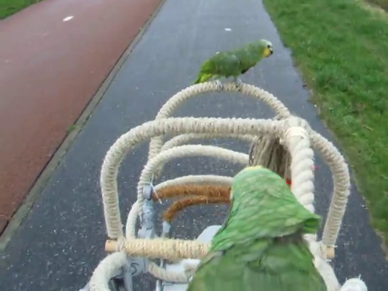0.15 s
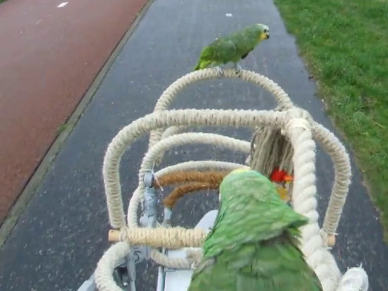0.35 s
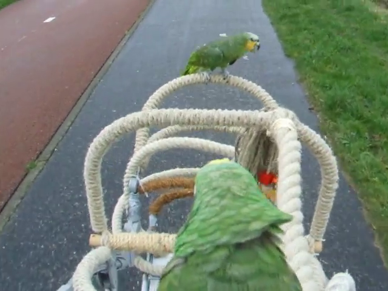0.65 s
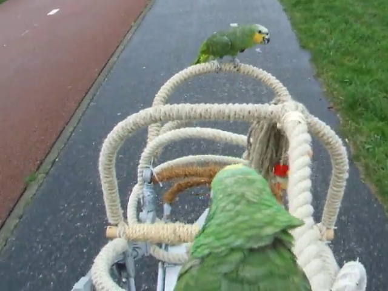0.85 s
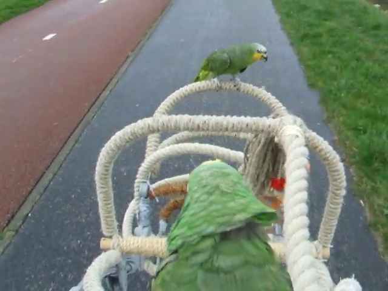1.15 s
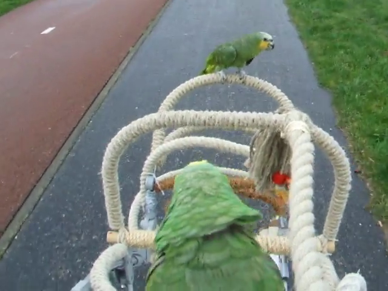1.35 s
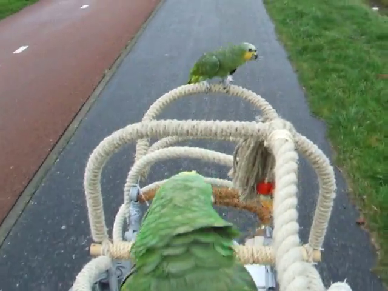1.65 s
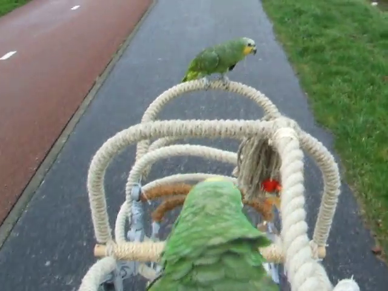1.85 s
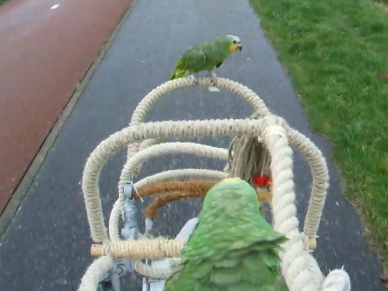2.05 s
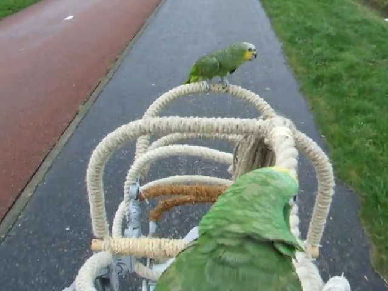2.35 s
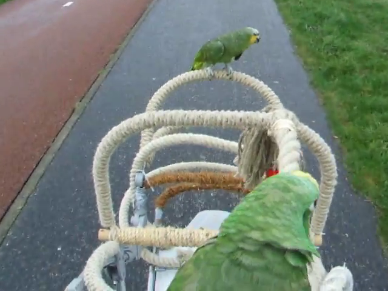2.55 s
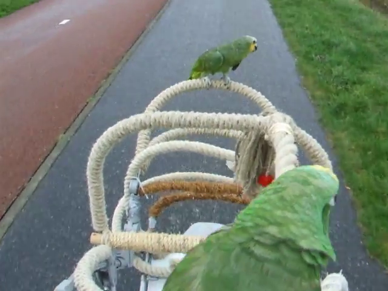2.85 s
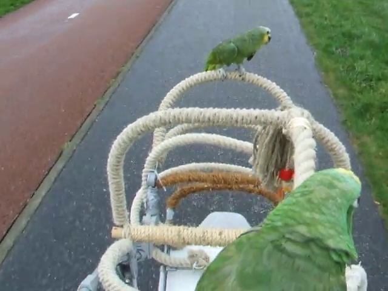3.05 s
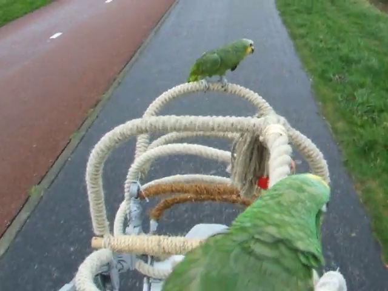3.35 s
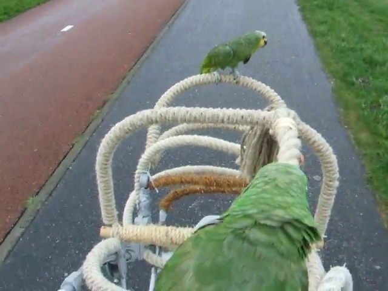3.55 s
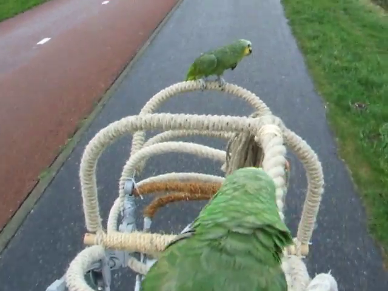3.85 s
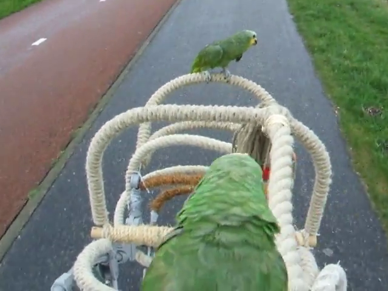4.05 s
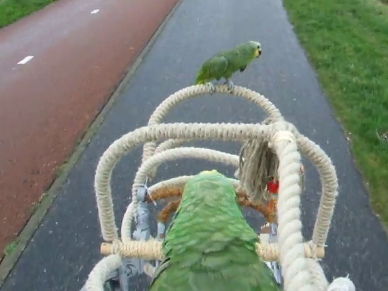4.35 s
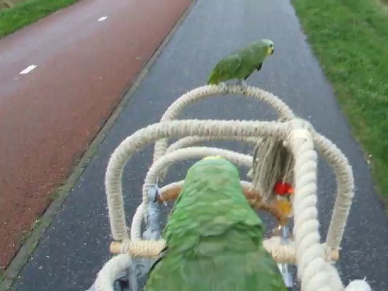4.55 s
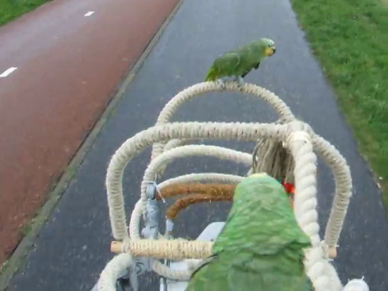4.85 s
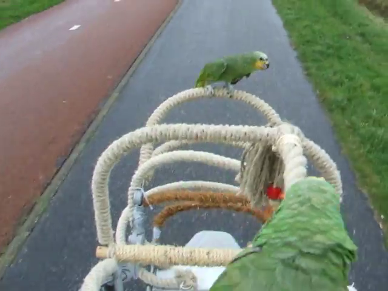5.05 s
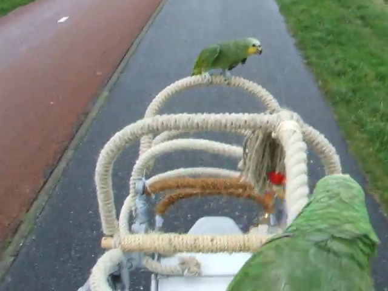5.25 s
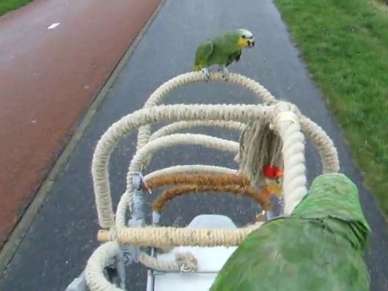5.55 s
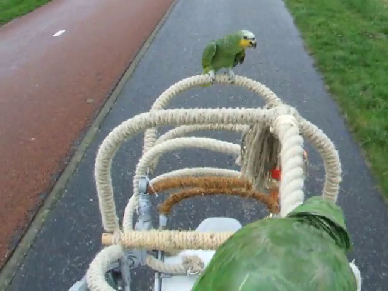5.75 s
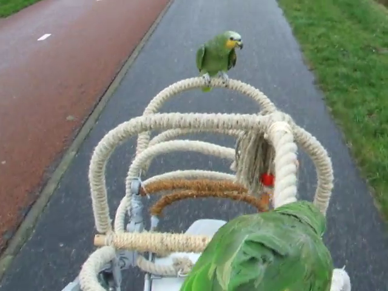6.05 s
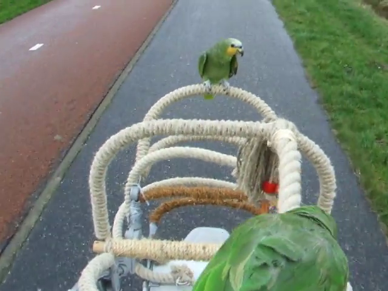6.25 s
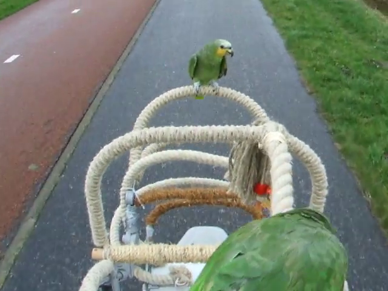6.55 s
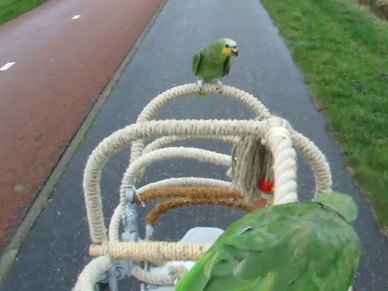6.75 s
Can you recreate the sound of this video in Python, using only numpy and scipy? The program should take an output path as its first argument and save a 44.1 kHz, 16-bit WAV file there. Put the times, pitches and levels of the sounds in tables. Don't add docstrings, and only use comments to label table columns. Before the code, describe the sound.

Riding outdoors on a bicycle, a parrot repeats loud, short, hoarse squawks, the first already under way at the start and the last ending before six seconds. Between them one hears faint smooth road hiss, dipping slightly under each call, a deep unsteady hum and gusts bumping the microphone. After the last squawk only hiss, hum and wind remain. The sound is mono, close and dry, with a dull top.

```python
import sys
import numpy as np
from scipy import signal
from scipy.io import wavfile
from scipy.ndimage import uniform_filter1d

SR = 44100
rng = np.random.default_rng(int(sys.argv[2]) if len(sys.argv) > 2 else 0)


def invert_db(level):
    return 10 ** (np.asarray(level, dtype=float) / 20)


def transcribe(signal):
    frames = np.atleast_2d(signal).T
    limited = np.clip(frames, -1, 1)
    pcm = np.round(limited * 32767).astype(np.int16)
    wavfile.write(sys.argv[1], SR, pcm)


N = 303849


def rms_one(x):
    return x / np.sqrt(np.mean(x ** 2) + 1e-20)


def in_time(rows):
    s, *columns = np.transpose(rows)
    return [np.interp(np.arange(N) / SR, s, c) for c in columns]


def drift(rate_hz):
    r = np.exp(-16 * np.pi * rate_hz / SR)
    white = rng.standard_normal(N // 8 + 4002)
    slow = signal.lfilter([1], [1, -2 * r, r * r], white)[4000:]
    return np.interp(np.arange(N) / 8, np.arange(len(slow)), rms_one(slow))


def band(x, low_hz, high_hz, order=2):
    return signal.sosfilt(signal.butter(order, [low_hz, high_hz], "band", fs=SR, output="sos"), x)


def resonances(x, modes):
    out = 0
    for k, (hz, width_hz, db) in enumerate(modes):
        r = np.exp(-np.pi * width_hz / SR)
        b = (1 - r * r) / 2 * np.array([1, 0, -1])
        a = [1, -2 * r * np.cos(2 * np.pi * hz / SR), r * r]
        out = out + (-1) ** k * invert_db(db) * signal.lfilter(b, a, x)
    return out


def evened(x, span_s):
    return x / np.sqrt(uniform_filter1d(x ** 2, int(span_s * SR)) + 1e-9)


def coloured_noise(spectrum, low_hz, patchy_db, flicker_hz, count):
    white = rng.standard_normal((2, N))
    together = drift(flicker_hz / 2)
    hz, db = np.transpose(spectrum)
    out = 0
    for k in range(count):
        low, high = low_hz * 2 ** (k / 3), low_hz * 2 ** ((k + 1) / 3)
        level_db = np.interp(np.log(low * high) / 2, np.log(hz), db)
        flicker = 0.7 * together + 0.52 * drift(flicker_hz)
        out = out + invert_db(level_db + patchy_db * flicker) * band(white[k % 2], low, high)
    return rms_one(out)


# start_s, settles_s, turns_s, breaks_s, end_s
SQUAWKS = [
    (-.17, -.03, .05, .13, .215),
    (.521, .66, .72, .832, .908),
    (1.272, 1.385, 1.595, 1.626, 1.668),
    (2.103, 2.222, 2.33, 2.402, 2.463),
    (2.787, 2.942, 3.02, 3.102, 3.158),
    (3.452, 3.565, 3.675, 3.756, 3.813),
    (4.067, 4.215, 4.26, 4.385, 4.448),
    (4.702, 4.815, 4.87, 5.028, 5.088),
    (5.382, 5.546, 5.585, 5.638, 5.733),
]
# early_climb_hz, late_climb_hz, settled_hz, turn_hz, break_hz
TUNES = [(600, 700, 780, 790, 812), (629.7, 780, 793, 803, 853), (559.8, 710, 760, 755, 655),
         (544.6, 700, 762, 741, 740), (564.4, 686, 749, 720, 738), (570.6, 655, 709, 713, 720),
         (553, 620, 717, 701, 729), (593, 665, 715, 731, 765), (576, 650, 835, 802, 783)]
# effort_db, beak_opening_db, edge_opening_db, late_climb_rough_0_1, held_rough_0_1
DELIVERY = [(-19, -7, -13, .4, .17), (-19.5, -6.5, -11, .42, 0.061), (-19, -5.5, -10.5, 0.3, 0.19),
            (-18.5, -6, -12, 0.5, .04), (-18, -9.5, -16, .2, .07), (-17.5, -11, -20, .3, .03),
            (-17.5, -10.5, -22, .22, 0.036), (-17, -10.5, -18, 0.1, .1), (-19, -8.5, -14, .65, .05)]
# after_start_s, pitch_hz
LIFT_PITCH = [(0, 399.8), (.02, 455.4)]
# after_start_s, rough_0_1
LIFT_ROUGH = [(0, .7), (.02, .25), (.038, .32), (.062, .68)]
EARLY_CLIMB_S, LATE_CLIMB_S = 0.045, 0.087
SNAP_S, SNAP_ROUGH, SNAP_HZ = 0.012, 0.4, 20
BREAK_S, BREAK_HZ, BREAK_ROUGH, LAST_HZ = 0.012, 45.18, 1, 557
TIRING_ROUGH = 0.041


def tune():
    pitch, rough = [], []
    for times, notes_hz, (*_, rasp, calm) in zip(SQUAWKS, TUNES, DELIVERY):
        start, settle, turn, snap, end = times
        early, late, held, mid, last = notes_hz
        pitch += [(start + s, hz) for s, hz in LIFT_PITCH]
        pitch += [(start + EARLY_CLIMB_S, early), (start + LATE_CLIMB_S, late)]
        pitch += [(settle - SNAP_S, held - SNAP_HZ), (settle, held), (turn, mid)]
        pitch += [(snap, last), (snap + BREAK_S, last - BREAK_HZ), (end, LAST_HZ)]
        rough += [(start + s, r) for s, r in LIFT_ROUGH]
        rough += [(start + LATE_CLIMB_S, rasp), (settle - SNAP_S, SNAP_ROUGH), (settle, calm)]
        rough += [(turn, calm), (snap, calm + TIRING_ROUGH)]
        rough += [(snap + BREAK_S, BREAK_ROUGH), (end, BREAK_ROUGH)]
    return in_time(pitch) + in_time(rough)


# centre_s, pitch_jump_hz, length_s, added_rough_0_1
SLIPS = [(0.026, 214.5, .016, 0), (.054, 70, .012, 0), (.086, 190, .024, 0.1), (0.635, 20, 0.0078, 0),
         (0.656, -29, .008, 0.2), (0.789, -21, .012, 0.04), (0.814, 51.5, 0.006, 0.4),
         (1.45, 23, .0063, .1), (1.497, 31.5, 0.0107, 0.1), (1.515, 18, .01, 0), (1.553, 190.5, .018, 0.5),
         (1.588, 40, .01, .17), (2.235, 14, .014, 0), (2.389, 36.5, .008, 0.27), (2.979, 16, 0.012, .08),
         (3.005, 16, 0.01, 0.13), (3.052, 35, 0.0063, 0.4), (3.616, 25, 0.011, 0), (3.687, 24.5, .008, 0.4),
         (3.705, 61, .007, 0.2), (3.729, 31.5, .01, 0), (3.748, 20, 0.0087, 0.07), (4.881, 26.5, .01, .35),
         (4.91, -21.5, .012, 0.4), (4.977, 75, .022, 0.06), (5.002, 101.5, .005, .4), (5.014, 113, .012, 0),
         (5.55, 113.5, 0.017, 0.09), (5.592, 112, 0.0091, .25), (5.62, 103.5, .014, 0)]
# centre_s, pitch_change_hz, length_s, added_rough_0_1
BENDS = [(.06, 60, .03, 0), (.585, -30, .03, .1), (.75, -68, .046, .42), (1.48, -14, 0.05, 0),
         (1.577, 45, .025, 0), (2.905, -8, .05, .25), (4.108, 30, .02, -.15), (4.765, 10, .04, -.25),
         (5.44, 15, .04, -.2), (5.505, -45, .05, .2), (5.69, -40, .04, 0)]


def syrinx():
    t = np.arange(N) / SR
    pitch, rough = tune()
    glide = pitch.copy()
    for s, jump_hz, length, added in SLIPS + BENDS:
        near = slice(max(int((s - length) * SR), 0), int((s + length) * SR))
        bump = np.exp(-((t[near] - s) / (length / 2)) ** 4)
        pitch[near] += jump_hz * bump
        rough[near] += added * bump
    sliding = np.abs(np.gradient(pitch - glide)) * SR / pitch
    rough = np.clip(rough + 0.005 * sliding, 0, 1)
    shaken = pitch * (1 + 0.003 * drift(70) + 0.02 * rough * drift(400))
    phase = 2 * np.pi * np.cumsum(shaken) / SR
    pulses = 0
    for k in range(1, 18):
        hoarse = np.clip(rough * np.minimum(0.2 + k * pitch / 2600, 1.9), 0, 0.88)
        patchy = invert_db(np.minimum(0.52 * k, 3.5) * drift(45))
        angle = k * phase + 0.12 * k * k
        clear = np.sqrt(1 - hoarse ** 2) * patchy * np.cos(angle)
        scattered = 0.75 * hoarse * (drift(330) * np.cos(angle) + drift(330) * np.sin(angle))
        pulses = pulses + (clear + scattered) * (k * pitch < 9500)
    strong_weak = 1 + 0.21 * rough * np.cos(phase / 2 + 2.2 * drift(27))
    air = 1.5 * (rough + 0.017) * band(rng.standard_normal(N), 4100, 9000, order=1)
    flutter = invert_db(1.0 * rough * drift(150))
    return flutter * (pulses * strong_weak + air), pitch, rough


# after_start_s, throat_db, beak_db, edge_db
OPENING = [(0, -40.5, -50, -43.5), (.007, -24, -28, -40), (.02, -10, -14, -29), (.036, 0.7, -3, -17),
           (.062, -0.9, 1.7, -5.5), (.1, -0.2, 0.2, -3.5)]
# before_end_s, level_db
CLOSING = [(0.07, -0.63), (0.041, -5), (0.023, -16), (0, -45)]
SWEET_HZ, RING_HZ, OFF_RING_DB = 735, 2180, 4.5
JOLT_DB_PER_HZ = 0.25
RASP_BEAK_DB, RASP_EDGE_DB = 4, 3.5
HIGH_BEAK_DB_PER_HZ, HIGH_EDGE_DB_PER_HZ = 0.045, 0.0372


def loudness(pitch, rough):
    rows = []
    for (start, *_, end), (db, beak_db, edge_db, *_) in zip(SQUAWKS, DELIVERY):
        shape = [(start + s, *rest) for s, *rest in OPENING]
        shape += [(end - s, d, d, d) for s, d in CLOSING]
        rows += [(s, db + a, db + beak_db + b, db + edge_db + c) for s, a, b, c in shape]
    throat_db, beak_db, edge_db = in_time(rows)
    high = uniform_filter1d(np.clip(pitch - SWEET_HZ, 0, 120), 300)
    rasp = uniform_filter1d(rough, 300)
    jolt = uniform_filter1d(np.clip(pitch - uniform_filter1d(pitch, 1300), 0, 25), 250)
    off = uniform_filter1d(np.sin(np.pi * RING_HZ / pitch) ** 2, 300)
    throat_db = throat_db - OFF_RING_DB * off * np.minimum(high / 40, 1) - JOLT_DB_PER_HZ * jolt * (1 - off)
    beak_db = beak_db + RASP_BEAK_DB * rasp + HIGH_BEAK_DB_PER_HZ * high
    edge_db = edge_db + RASP_EDGE_DB * rasp + HIGH_EDGE_DB_PER_HZ * high
    return throat_db, beak_db, edge_db


# centre_hz, width_hz, level_db
THROAT = [(690, 910, -10.5), (1575, 1130, -1.5), (2186, 166, 7.5), (3070, 360, -11.5)]
BEAK = [(3750, 450, 0.3), (4680, 750, 3), (5530, 420, -1.5)]
EDGE = [(5930, 980, -3.5), (7400, 790, -0.5), (7860, 990, -8), (8800, 390, -6)]
# late_s, level_db
ECHOES = [(.035, -53.5), (.065, -44), (.1, -51.5)]
CHEST_DB, VALLEY_DB = -15, -5.5


def parrot():
    t = np.arange(N) / SR
    sounding = sum(np.interp(t, [s - 0.004, s, end, end + 0.004], [0, 1, 1, 0]) for s, *_, end in SQUAWKS)
    source, pitch, rough = syrinx()
    throat_db, beak_db, edge_db = loudness(pitch, rough)
    strain = rough + np.clip((pitch - 800) / 150, 0, 1.5)
    filled = invert_db(VALLEY_DB) * strain * band(source, 2730, 3420)
    chest = invert_db(CHEST_DB) * band(source, 560, 725)
    throat = evened(band(resonances(source, THROAT), 460, 4040) + filled + chest, 0.036)
    beak = evened(band(resonances(source, BEAK), 2200, 5600, order=3), 0.037)
    edge = evened(band(resonances(source, EDGE), 5600, 11000, order=3), 0.03)
    voice = sounding * (invert_db(throat_db) * throat + invert_db(beak_db) * beak + invert_db(edge_db) * edge)
    out = voice + lisp()
    dull = band(voice, 1200, 4500, order=1)
    for late_s, db in ECHOES:
        lag = int(late_s * SR)
        out[lag:] += invert_db(db) * dull[:-lag]
    return out


# time_s, level_db
HUM = [(0.0, -43), (0.17, -39.5), (0.77, -44), (1.0, -37.5), (1.73, -42), (1.74, -35.5), (2.84, -49),
       (2.94, -34), (3.11, -52), (3.2, -37.5), (3.51, -51), (3.57, -36), (3.84, -45), (3.99, -36),
       (4.15, -53), (4.2, -39), (6.81, -41), (6.89, -45)]
HUM_HZ = 60.1


def frame_hum():
    phase = 2 * np.pi * np.cumsum(HUM_HZ * (1 + 0.0399 * drift(8))) / SR
    level_db = in_time(HUM)[0] + 2.7 * drift(9.2)
    return np.sqrt(2) * invert_db(level_db) * np.sin(phase)


# time_s, level_db
WIND = [(0.0, -43.5), (0.59, -55), (1.57, -42.5), (2.76, -40), (3.01, -30), (3.38, -42), (3.87, -33.5),
        (4.01, -50.5), (4.2, -42), (4.76, -51), (4.81, -36.5), (4.89, -54), (6.01, -47.5), (6.02, -54.5),
        (6.75, -34.5), (6.89, -62.5)]
# peak_s, over_buffeting_db, length_s
GUSTS = [(.31, 5, 0.052), (.52, 6, 0.027), (1.25, 5.5, 0.094), (1.76, 3, 0.078), (2.57, 13, .09),
         (2.88, 3.5, .1), (3.03, 18.5, 0.04), (3.16, 11, 0.079), (3.48, 10, .08), (3.855, 17, .04),
         (4.25, 2, .06), (4.76, 3.5, .08), (5.41, 6.5, 0.088), (6.02, 4.5, .12), (6.62, 5, 0.19),
         (6.77, 7, .06), (6.89, 9, 0.063)]
# pitch_hz, density_db_per_hz
BUFFET = [(41, -30), (70, -8.5), (86, 0.5), (130, -6.5), (220, -10.5), (253, -16.5), (500, -21), (650, -52),
          (1100, -120)]
BUFFET_DB, BUFFET_FOLLOWS = -44.5, 0.11


def wind():
    t = np.arange(N) / SR
    swell_db, = in_time(WIND)
    gust_db = sum(np.interp(t, [s - length, s, s + length], [0, db, 0]) for s, db, length in GUSTS)
    swell = rms_one(band(rng.standard_normal(N), 10, 38))
    buffet = coloured_noise(BUFFET, 74.9, patchy_db=3.0, flicker_hz=19, count=8)
    buffet_db = BUFFET_DB + BUFFET_FOLLOWS * (swell_db - swell_db.mean()) + gust_db
    return invert_db(swell_db) * evened(swell, 0.2) + invert_db(buffet_db) * evened(buffet, 0.13)


# pitch_hz, density_db_per_hz
ROAD_COLOUR = [(240, -33), (400, -3), (444, -8.5), (605, 2), (916, 5), (2680, -6.5), (3300, -7),
               (7260, -9.5), (8060, -23.5), (8820, -28.5), (11500, -64), (19400, -120)]
ROAD_DB, DUCK_DB, RECOVER_S = -47.5, 4.0, 0.32


def road():
    t = np.arange(N) / SR
    dips = [(t > s) * np.exp(-np.maximum(t - end, 0) / RECOVER_S) for s, *_, end in SQUAWKS]
    hiss = coloured_noise(ROAD_COLOUR, 403.7, patchy_db=-0.5, flicker_hz=9, count=14)
    return invert_db(ROAD_DB - DUCK_DB * np.max(dips, axis=0)) * hiss


# start_s, length_s, level_db
LISP = [
    (1.256, 0.036, -63),
    (2.116, .03, -64),
    (2.795, 0.057, -47.5),
    (3.445, 0.053, -52.5),
    (4.072, 0.055, -58),
    (4.706, 0.087, -49.5),
    (5.386, 0.054, -49),
]


def lisp():
    t = np.arange(N) / SR
    shape = sum(invert_db(db) * np.interp(t, [s, s + 0.004, s + length], [0, 1, 0]) for s, length, db in LISP)
    return shape * rms_one(band(rng.standard_normal(N), 7500, 7700))


def scene():
    return (parrot() + frame_hum() + wind() + road())[None]


def band_limit(x):
    return signal.sosfilt(signal.butter(12, 8970, fs=SR, output="sos"), x)


def record(dry):
    rounded = 0.8 * np.tanh(dry / 0.8)
    top_cut = signal.cheby2(10, 60, 9600, fs=SR, output="sos")
    mix = signal.sosfilt(top_cut, rounded) - 0.0024
    return band_limit(mix)


dry = scene()
out = record(dry)
transcribe(out)
```